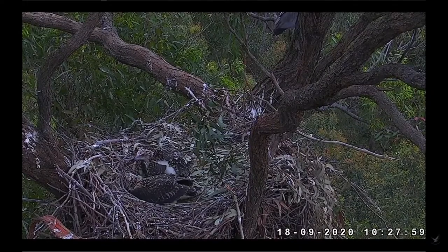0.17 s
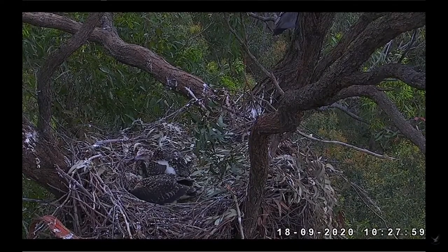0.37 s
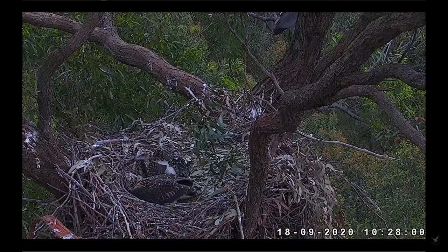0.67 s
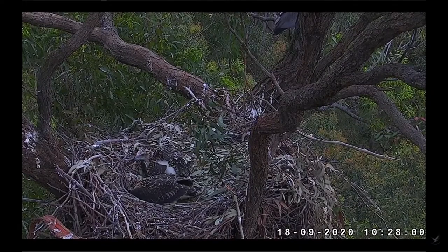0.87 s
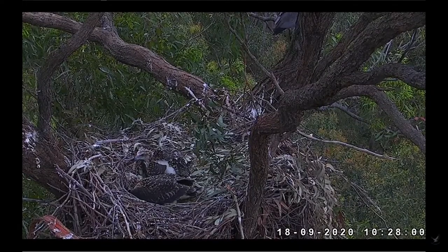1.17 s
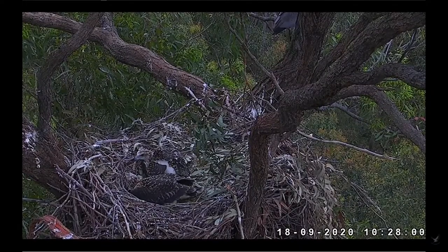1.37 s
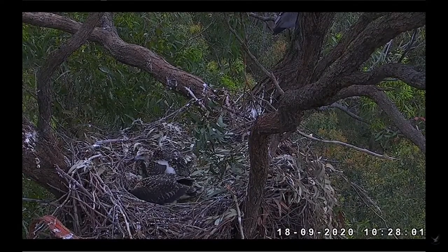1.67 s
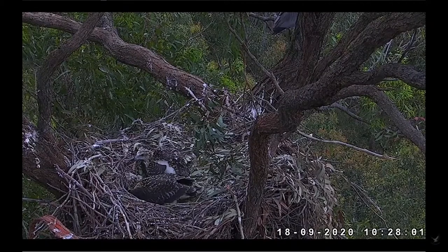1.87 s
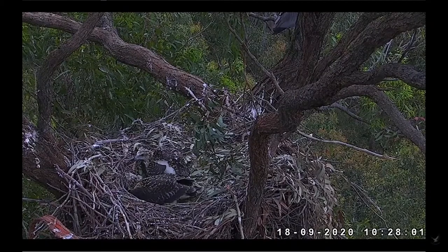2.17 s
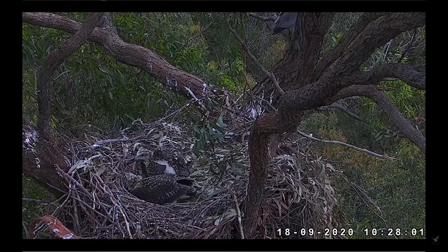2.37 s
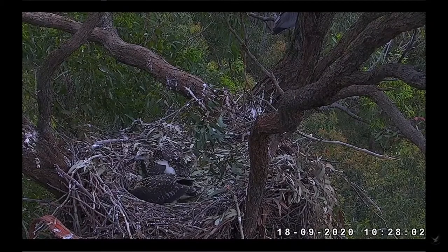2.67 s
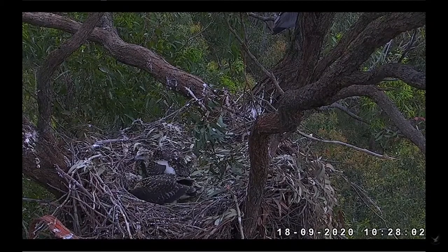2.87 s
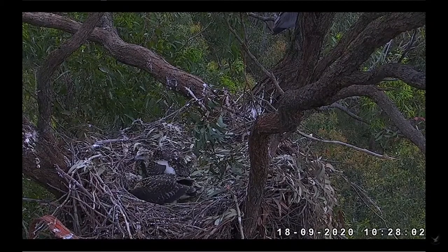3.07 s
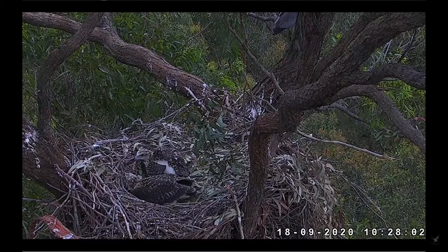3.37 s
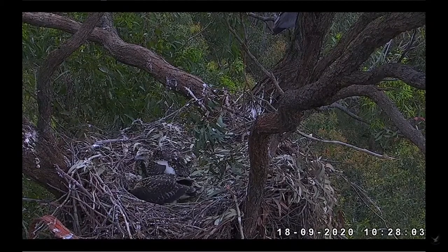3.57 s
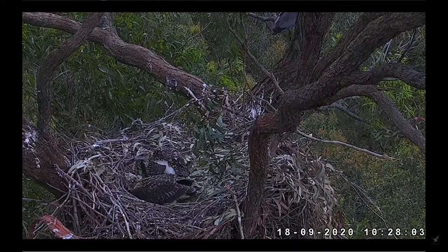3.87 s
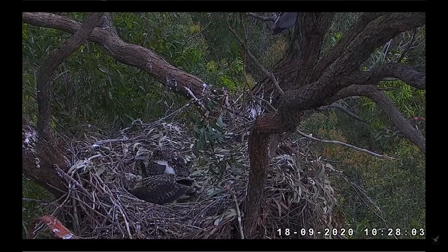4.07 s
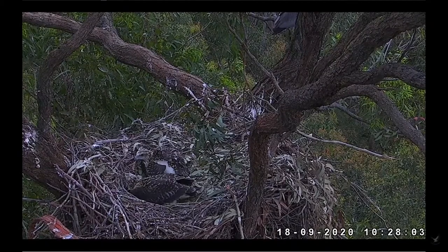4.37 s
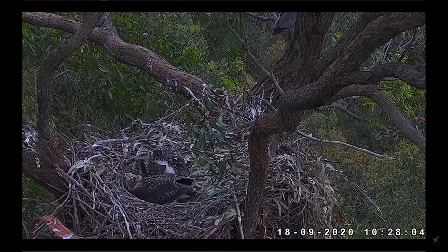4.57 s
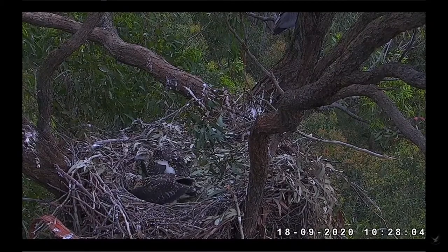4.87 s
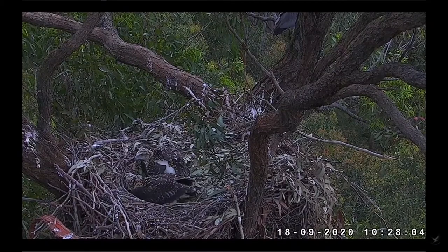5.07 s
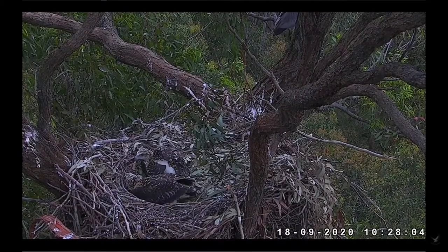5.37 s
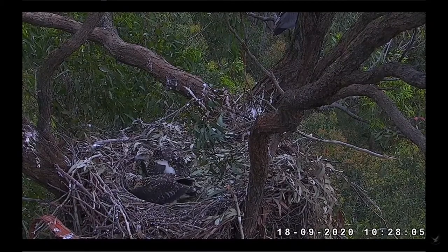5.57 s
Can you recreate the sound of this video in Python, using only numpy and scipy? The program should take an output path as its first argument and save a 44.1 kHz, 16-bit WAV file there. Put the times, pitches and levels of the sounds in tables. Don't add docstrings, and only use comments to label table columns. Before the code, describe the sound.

Loud nasal honks from a close eagle overlap quick, fainter, higher honks from its mate, with thin woodland echo and soft low rumble.

```python
import sys
import numpy as np
from scipy import signal
from scipy.io import wavfile
from scipy.ndimage import uniform_filter1d, map_coordinates

SR = 44100
rng = np.random.default_rng(int(sys.argv[2]) if len(sys.argv) > 2 else 0)


def int16_out(signal):
    q = np.round(np.clip(np.atleast_2d(signal).T, -1, 1) * 32767)
    wavfile.write(sys.argv[1], SR, q.astype(np.int16))


def linear_from_db(decibels):
    return 10 ** (np.asarray(decibels, float) / 20)


N = 251370

# start_s, creak_s, length_s, top_pitch_hz, level_db
NEAR_HONKS = [(0.435, 0.027, 0.12, 389.4, -22), (0.706, 0.021, 0.14, 389.5, -22),
              (1.049, 0.01175, 0.13, 386.9, -22), (1.397, 0.019, 0.12, 385, -23.5),
              (2.518, 0.029, 0.11, 384.5, -22), (2.77, 0.031, 0.15, 389.2, -21),
              (3.113, 0.021, 0.12, 388.8, -22), (3.451, 0.02, 0.12, 386.7, -21),
              (5.194, 0.024, 0.15, 389.3, -23), (5.504, 0.03, 0.15, 391.5, -22.5)]
# start_s, length_s, first_pitch_hz, last_pitch_hz, level_db
NEAR_GRUNTS = [
    (1.954, 0.032, 385.4, 389.4, -18),
    (4.151, 0.032, 377.4, 379.5, -19),
    (4.853, 0.0597, 369.3, 390, -18),
]
# start_s, length_s, top_pitch_hz, level_db
FAR_HONKS = [(0.096, 0.067, 424.5, -28), (0.325, 0.057, 422, -27.5), (0.568, 0.053, 420, -26.5),
             (0.783, 0.069, 423.6, -28), (0.99, 0.078, 429, -27.5), (1.223, .083, 436.3, -27.5),
             (1.463, 0.088, 438.7, -27), (1.719, 0.09, 433.5, -27), (1.97, 0.059, 421.6, -26.5),
             (2.273, 0.046, 417.8, -27.5), (2.767, 0.075, 424.7, -28.5), (2.967, 0.079, 428.7, -28),
             (3.173, 0.085, 428.8, -28), (3.397, 0.079, 429.3, -28), (3.625, 0.07, 427, -29),
             (3.860, 0.068, 432, -28), (4.084, 0.074, 425, -27), (4.317, 0.062, 423.8, -26),
             (4.555, 0.055, 422.9, -25.5), (4.779, 0.06, 421.5, -26.5), (4.994, 0.067, 423.6, -26),
             (5.21, 0.079, 427, -27.5), (5.428, 0.07, 424.6, -27.5), (5.649, 0.061, 426, -27.5)]
# frequency_hz, gain_db
NEAR_THROAT = [(100, -74), (385, -12), (770, -14.5), (950, -2.5), (1155, -4), (1540, 4.5), (1925, -1),
               (2310, -27), (2700, -10), (3080, -19.5), (3465, -0.5), (3850, -33.5)]
# frequency_hz, gain_db
GRUNT_THROAT = [(100, -45), (375, -44.5), (750, -25), (1125, -17.5), (1500, -9), (1880, -14), (2250, -28.5),
                (2630, -22.5), (3000, -15.5), (3380, -11), (3800, -35)]
# frequency_hz, gain_db
FAR_THROAT = [(100, -39.5), (425, -16.5), (740, -1.5), (850, -31), (1275, -5), (1700, -1.5), (2125, -4.5),
              (2550, -32), (2975, -4.5), (3400, -13.5), (3825, -17.5)]
# frequency_hz, t60_s
BRANCHES = [(300, .12), (3500, .12)]
# frequency_hz, t60_s
WOODS = [(300, 1), (1500, 0.39), (3500, 0.35)]
# frequency_hz, density_db_per_hz
WASH_SPECTRUM = [(9, -49), (16, -14.5), (32, -25.5), (100, -22), (145, -22), (180, -21.5), (240, -8),
                 (400, -31), (680, -20), (1000, -31.5), (1500, -34), (2400, -41), (3900, -48)]
# pitch_hz, wander_width_hz, level_db
HUM_TONES = [(25, 2.6, -61.5), (94.1, 0.92, -53.5), (175.1, 5.74, -55.5), (232.2, 7, -62), (1142, 4.8, -63),
             (1490, 11, -68), (1760, 24, -77.5), (3210, 22, -75)]
# frequency_hz, gain_db
TREBLE_RESPONSE = [(6900, 1.5), (7400, -6.5), (8600, -8), (9000, 0), (14900, 0), (15200, -18), (15600, -49)]

NEAR_CLIMB_HZ_PER_S, NEAR_TOP_PLACE, NEAR_LAST_HZ = 172, 0.608, 351.8
GULP_DB, GULP_DB_PER_S = -25.5, -140
FAR_CLIMB_HZ, FAR_TOP_S, FAR_SAG_HZ_PER_S2 = 19.2, 0.028, 9800
WASH_DB = -45
CAMERA_RATE_HZ = 8000


def near_honk(start_s, creak_s, length_s, top_hz, level_db):
    t = np.arange(0, length_s + 0.02, 1 / SR)
    clean_s = length_s - creak_s
    u = np.clip((t - creak_s) / clean_s, 0, 1.2)
    snapped = np.clip((t - creak_s) / 0.007 + 1, 0, 1)
    creak_hz = np.clip(340 - 2400 * (creak_s - t), 298, 340)
    low_hz = top_hz - NEAR_CLIMB_HZ_PER_S * clean_s
    clean_hz = arch(u, low_hz, top_hz, NEAR_TOP_PLACE, NEAR_LAST_HZ)
    hz = creak_hz * (1 - snapped) + clean_hz * snapped
    swell_db = -6 * (1 - snapped) - 0.14 * (top_hz - hz).clip(max=25)
    breaking = np.clip((t - length_s) / 0.014 + 1, 0, 1)
    rough = 0.08 + 0.15 * (1 - snapped) + 0.8 * breaking
    shut = breaking + (1 - snapped) / 2
    note = voice(hz, NEAR_THROAT, rough, shut, spread=-0.5)
    shape = edges(t, length_s, rise_s=0.013, fall_s=0.024)
    return start_s - 0.003, linear_from_db(level_db + swell_db) * note * shape


def grunt(start_s, length_s, first_hz, last_hz, level_db):
    t = np.arange(0, length_s + 0.022, 1 / SR)
    hz = first_hz + (last_hz - first_hz) * t / length_s - 30 * np.exp(-t / 0.01)
    gulp_hz = hz - 190 * (t / (length_s + 0.0077)) ** 1.75
    rough = 0.12 + 0.4 * (t / length_s).clip(0, 1) ** 6
    note = voice(hz, GRUNT_THROAT, rough, wobble=0.006, spread=-0.55)
    beat = 1 + 0.22 * np.cos(2 * np.pi * np.cumsum(hz - gulp_hz) / SR)
    husky = linear_from_db(level_db) * note * beat * edges(t, length_s, rise_s=0.3 * length_s, fall_s=0.022)
    turns = 2 * np.pi * np.cumsum(gulp_hz) / SR
    gulp = np.sin(turns) + 0.44 * np.sin(2 * turns)
    gulp *= linear_from_db(GULP_DB + GULP_DB_PER_S * length_s)
    gulp *= edges(t, length_s + 0.014, rise_s=0.014, fall_s=0.063)
    return start_s - 0.003, husky + gulp


def far_honk(start_s, length_s, top_hz, level_db):
    t = np.arange(-0.014, length_s + 0.02, 1 / SR)
    u = np.clip(t / length_s, 0, 1)
    last_hz = top_hz - FAR_SAG_HZ_PER_S2 * (length_s - FAR_TOP_S) ** 2
    scoop = np.exp(-(t - t[0]) / 0.0092)
    hz = arch(u, top_hz - FAR_CLIMB_HZ, top_hz, FAR_TOP_S / length_s, last_hz) - 52 * scoop
    breaking = np.clip((t - length_s) / 0.012 + 1, 0, 1)
    rough = 0.04 + 1.1 * scoop + 0.8 * breaking
    note = voice(hz, FAR_THROAT, rough, breaking + scoop, spread=0.27)
    shape = edges(t - t[0], length_s - t[0], rise_s=0.022, fall_s=0.022)
    return start_s + t[0], linear_from_db(level_db + 2.56 * u) * note * shape


def voice(hz, throat, rough, shut=0, wobble=0.0015, spread=0):
    n = len(hz)
    grid_hz = np.fft.rfftfreq(8192, 1 / SR)
    log_gain = np.log(linear_from_db(read(throat, grid_hz)))
    mirrored = np.r_[log_gain, log_gain[-2:0:-1]]
    lag = -signal.hilbert(mirrored).imag[:len(grid_hz)]
    shake = evened(uniform_filter1d(rng.standard_normal(8192), 400))[:n]
    turns = 2 * np.pi * np.cumsum(hz * (1 + wobble * shake)) / SR
    k = np.arange(1, 13)[:, None]
    line_hz = k * hz
    gain = linear_from_db(read(throat, line_hz)) * (line_hz < CAMERA_RATE_HZ / 2)
    gain *= linear_from_db(-16 * shut * np.log2(line_hz / 2000).clip(0))
    turning = uniform_filter1d(rng.standard_normal((12, 8192)), 1600, axis=1)[:, :n] * 40
    gain *= linear_from_db(3 * turning * (k > 5))
    flutter = uniform_filter1d(rng.standard_normal((12, 8192)), 100, axis=1)[:, :n] * 10
    gain *= 1 + rough * np.sqrt(k / 4) * flutter
    lines = gain * np.cos(k * turns + spread * k ** 2 + np.interp(line_hz, grid_hz, lag))
    air = signal.lfilter([0.3], [1, -0.7], rng.standard_normal(8192))[:n]
    return linear_from_db(-24) * (1 + 6 * rough) * air - lines.sum(0)


def arch(u, first_hz, top_hz, place, last_hz):
    climb_hz = top_hz - (top_hz - first_hz) * (1 - u / place) ** 2.3
    sink_hz = top_hz - (top_hz - last_hz) * (np.maximum(u - place, 0) / (1 - place)) ** 2.76
    return np.where(u < place, climb_hz, sink_hz)


def edges(t, length_s, rise_s, fall_s):
    rise = np.clip(t / rise_s, 0, 1) ** 2
    fall = np.clip((length_s + fall_s / 2 - t) / fall_s, 0, 1) ** 2
    return rise * fall


def woods(x, decay, first):
    taps = np.zeros(2 * SR)
    at = np.arange(first, 2 * SR - 20, 20)
    taps[at + rng.integers(0, 20, len(at))] = rng.choice([-1., 1.], len(at))
    hz, t, z = signal.stft(taps, SR, nperseg=256)
    fading = linear_from_db(-60 * t / read(decay, hz)[:, None])
    tail = signal.istft(z * fading, SR, nperseg=256)[1]
    return signal.fftconvolve(x, tail / np.linalg.norm(tail))[:N]


def hum():
    out = np.zeros(N)
    for hz, width_hz, level_db in HUM_TONES:
        drift, swell = (blurred(v, 2500, 2500) for v in rng.standard_normal((2, N)))
        turns = 2 * np.pi * np.cumsum(hz + width_hz / 2 * drift) / SR
        out += linear_from_db(level_db + 4.5 + 0.35 * width_hz * swell) * np.sin(turns)
    return out


def wash():
    hop = 256
    frames, hz = N // hop + 5, np.fft.rfftfreq(2048, 1 / SR)
    a, b, patches = rng.standard_normal((frames, len(hz), 3)).T
    patches = blurred(patches, 14, 16)
    z = (a + 1j * b) * linear_from_db(read(WASH_SPECTRUM, hz)[:, None] + 1.8 * patches)
    noise = signal.istft(z, nperseg=2048, noverlap=2048 - hop)[1][:N]
    return linear_from_db(WASH_DB) * evened(noise)


def read(points, hz):
    f, value = np.transpose(points)
    return np.interp(np.log(hz + 1), np.log(f + 1), value)


def evened(x):
    return x / np.sqrt(np.mean(x ** 2) + 1e-20)


def blurred(x, first, last):
    return evened(uniform_filter1d(uniform_filter1d(x, first, axis=0), last, axis=-1))


def add(mix, start_s, sound):
    part = mix[round(start_s * SR):][:len(sound)]
    part += sound[:len(part)]


def scene():
    near, far = np.zeros((2, N))
    for row in NEAR_HONKS:
        add(near, *near_honk(*row))
    for row in NEAR_GRUNTS:
        add(near, *grunt(*row))
    for row in FAR_HONKS:
        add(far, *far_honk(*row))
    close = woods(linear_from_db(-14) * near + linear_from_db(-21) * far, BRANCHES, first=200)
    distant = woods(linear_from_db(-29) * near + linear_from_db(-27) * far, WOODS, first=1500)
    mono = near + far + close + distant + hum() + wash()
    return np.array([mono, mono])


def treble_dropouts(samples):
    hz, t, z = signal.stft(samples, CAMERA_RATE_HZ, nperseg=256, noverlap=192)
    chance = blurred(rng.standard_normal((len(t), len(hz))).T, 24, 3)
    faint = uniform_filter1d(abs(z) ** 2, 16, 0) < linear_from_db(-2 * 76)
    dropped = faint * (chance > 1.2) * (hz > 1300)[:, None]
    kept = z * linear_from_db(-14 * dropped)
    return signal.istft(kept, CAMERA_RATE_HZ, nperseg=256, noverlap=192)[1][:len(samples)]


def camera(x):
    band_limit = signal.firwin(701, 3880, window=("kaiser", 6), fs=SR)
    limited = signal.oaconvolve(x, band_limit, "same") + 0.0083
    at = np.arange(0, N, SR / CAMERA_RATE_HZ)
    samples = map_coordinates(limited, [at], order=3, mode="nearest")
    return np.interp(np.arange(N), at, treble_dropouts(samples))


def patchy_treble(x):
    hz, t, z = signal.stft(x, SR, nperseg=1024)
    patches = rng.standard_normal((len(t), len(hz), 2)).T
    same, other = (blurred(p, 20, 2) for p in patches)
    top = (hz > 8300)[:, None]
    mid = z * linear_from_db(top * 2.85 * same + read(TREBLE_RESPONSE, hz)[:, None])
    side = mid * top * 2.6 * np.sign(other) * np.maximum(abs(other) - 1.65, 0)
    return signal.istft(np.array([mid + side, mid - side]), SR, nperseg=1024)[1][:, :N]


def low_pass(x):
    return signal.sosfilt(signal.butter(12, 15630, fs=SR, output="sos"), x)


def record(dry):
    mix = patchy_treble(camera(dry[0]))
    return low_pass(mix)


dry = scene()
out = record(dry)
int16_out(out)
```